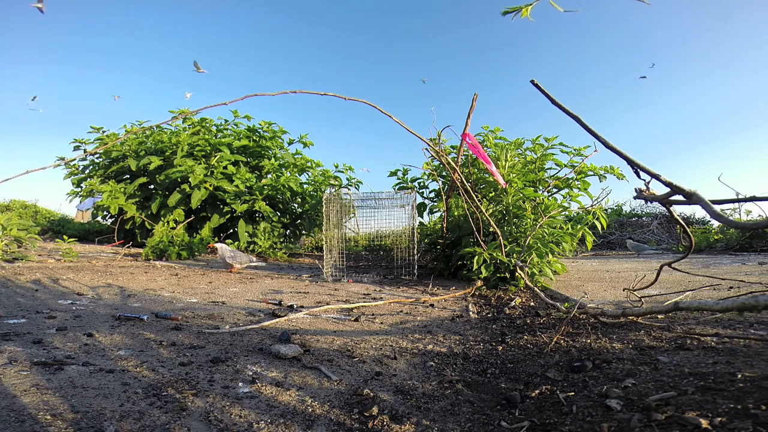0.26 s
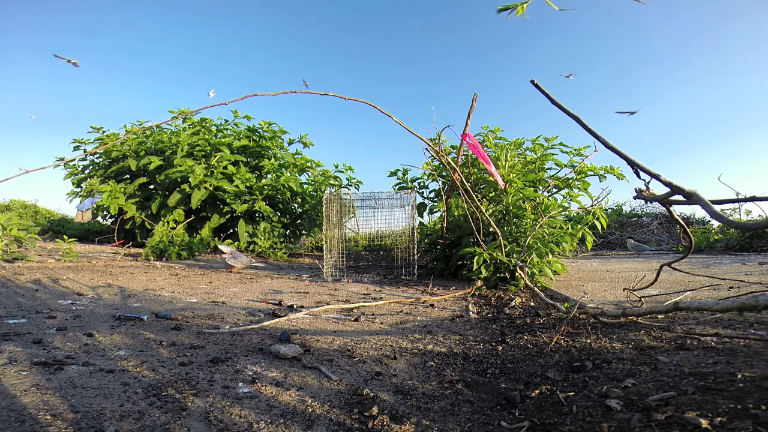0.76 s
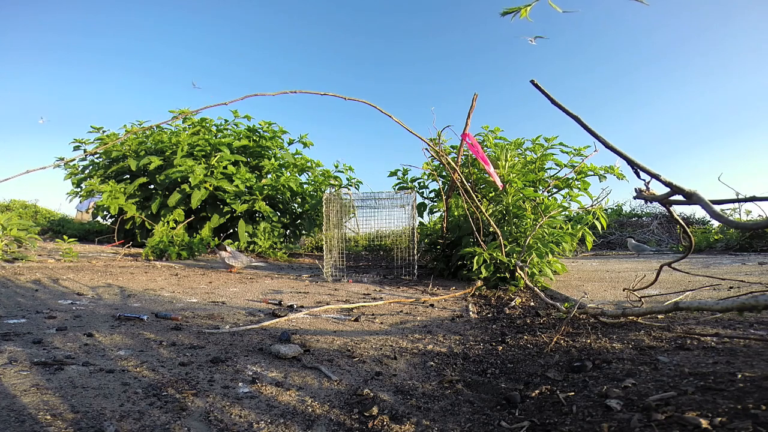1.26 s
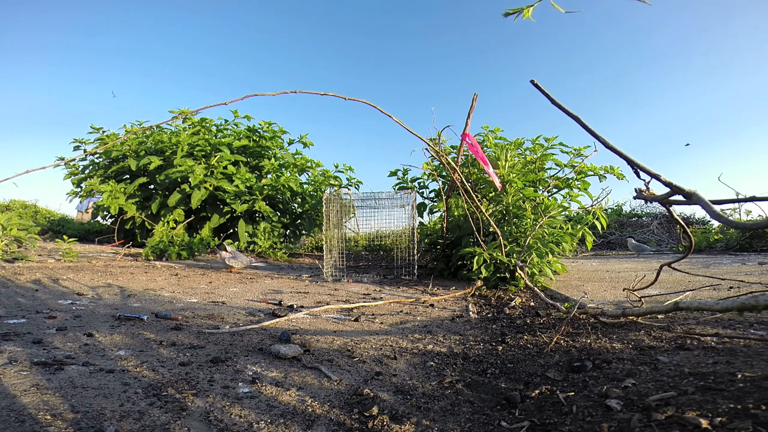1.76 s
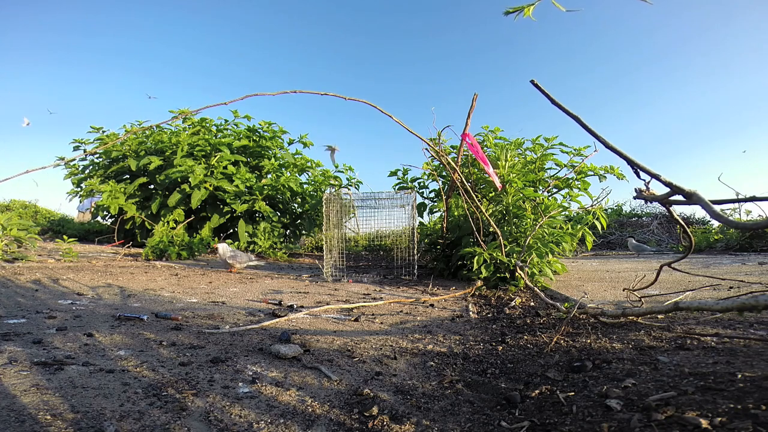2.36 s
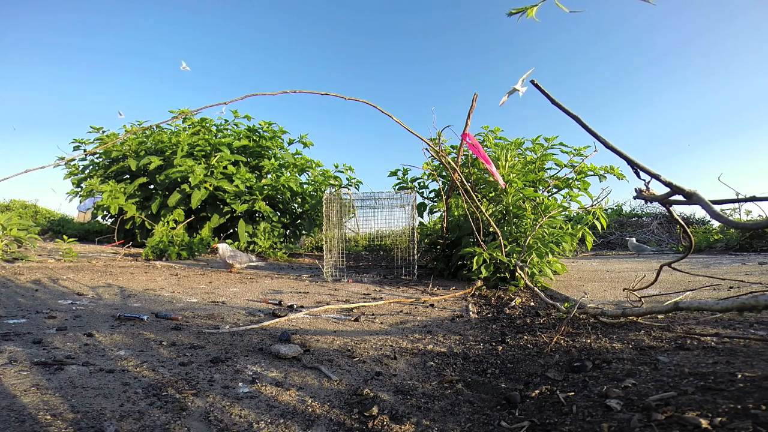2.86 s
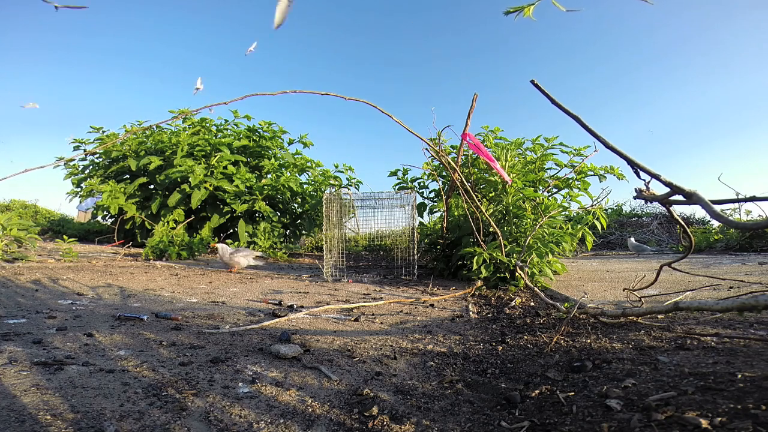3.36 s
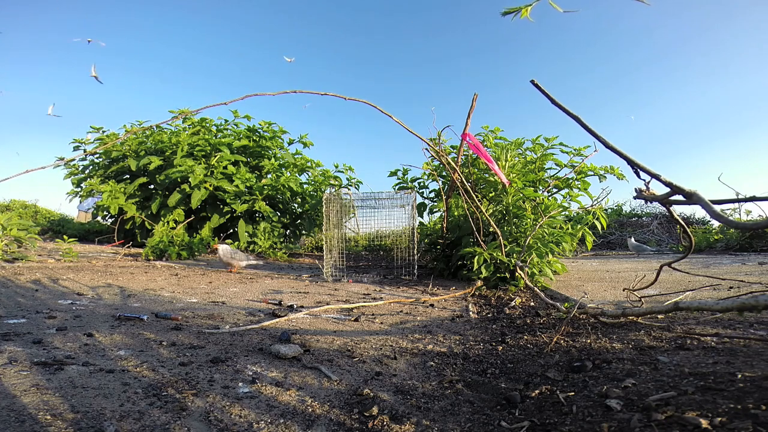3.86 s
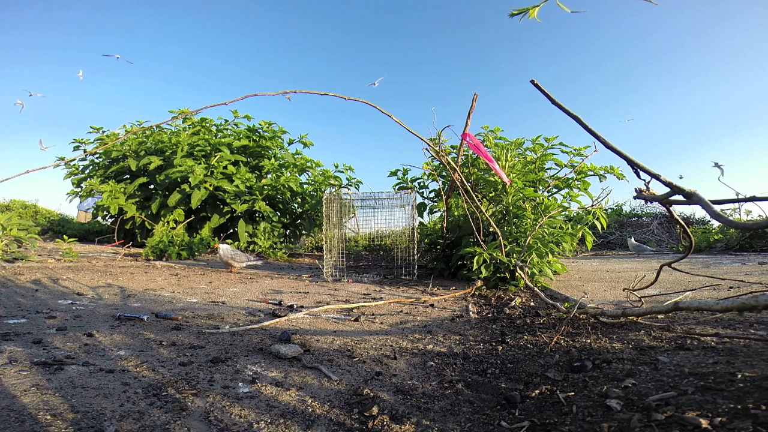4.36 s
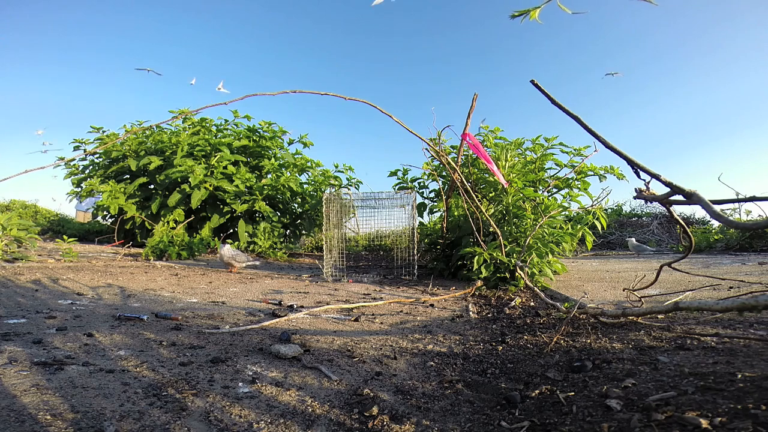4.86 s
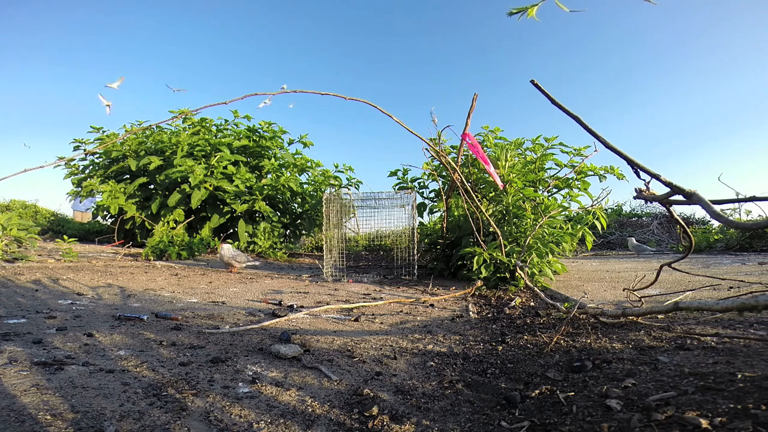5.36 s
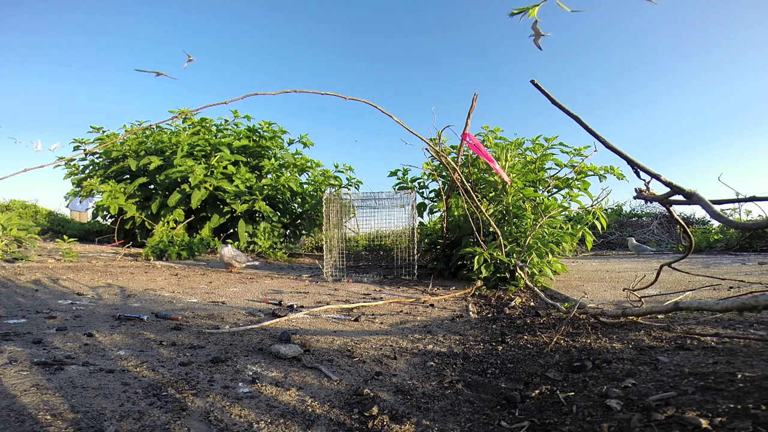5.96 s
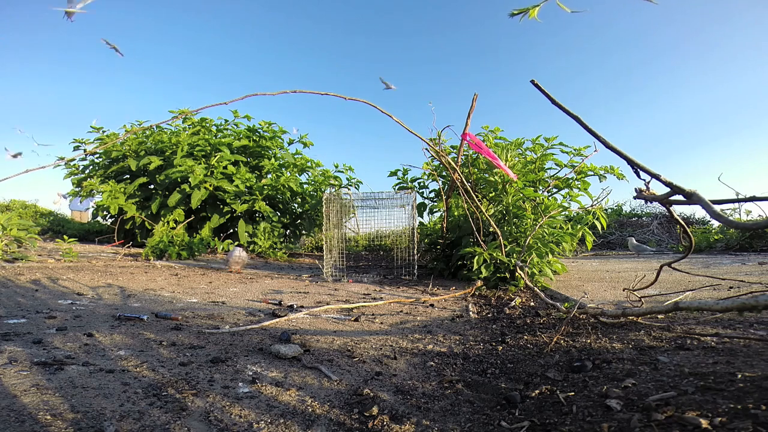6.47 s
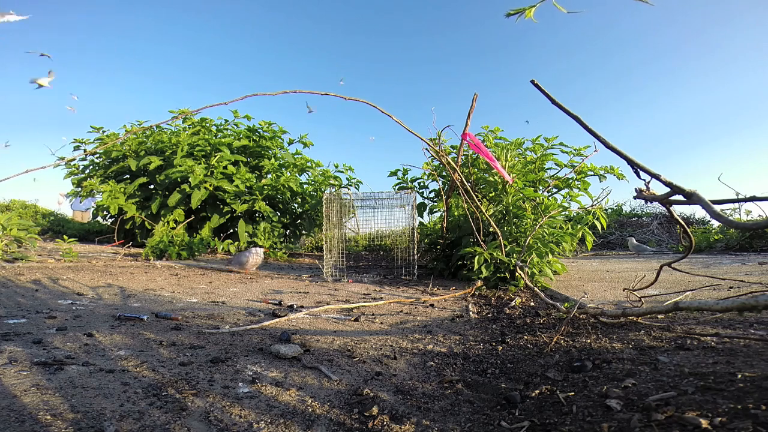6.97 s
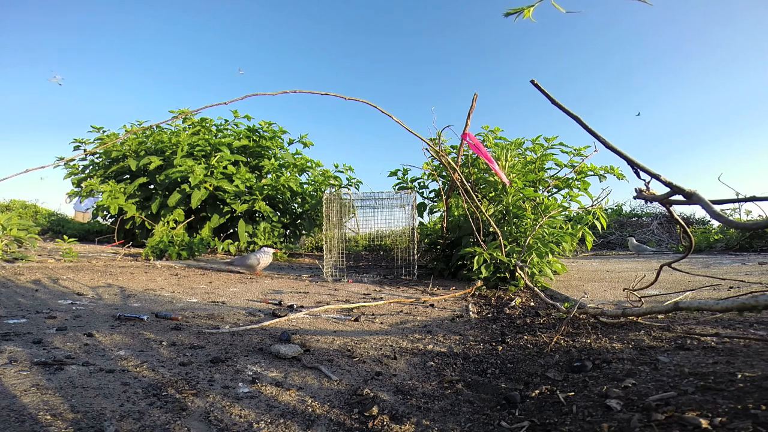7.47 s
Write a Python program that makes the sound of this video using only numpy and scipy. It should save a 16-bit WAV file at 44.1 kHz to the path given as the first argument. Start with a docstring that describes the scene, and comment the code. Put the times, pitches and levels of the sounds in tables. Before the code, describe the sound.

Many seabirds shriek, whistle and scold at once at an open nesting ground, with a few loud raspy cries close by.

```python
"""Tern cries from close by, over open ground among the nests: a clear arch falls, then breaks into a rasp.
Near birds also give low squawks, scolding trills, short kips and dry clicks; others whistle further off.
Harmonics shaped by a throat make the voices; roughness doubles the period, then turns to uneven slaps.
Random distant calls and coloured noise blur into the colony's din, over a low rumble, hum and whine."""
import sys
import numpy as np
from scipy import signal
from scipy.fft import rfft, irfft, next_fast_len
from scipy.io import wavfile

SR = 44100
rng = np.random.default_rng(int(sys.argv[2]) if len(sys.argv) > 2 else 0)


def wrap_up_sound(samples):
    """Save the sound to the file named by the first command line argument, as 16-bit audio."""
    columns = np.atleast_2d(samples).T
    # keep every value between -1 and 1, then stretch to whole-number steps
    tamed = np.clip(columns, -1, 1)
    steps = np.round(tamed * 32767).astype(np.int16)
    wavfile.write(sys.argv[1], SR, steps)


N = 340881
TIME = np.arange(N) / SR

# Call levels below are set before the layer trims in scene() and before the outdoor reflections.
# Two-part cries, a clear arch and its harsh low tail:
# (time [s], length [s], top pitch [Hz], pitch at the break [Hz], bend of the fall [1 straight, 5 late],
#  opened level [dB], time until it opens [s], swell on opening [dB], brightness [dB], ground echo [ms],
#  tail length [s], tail start pitch [Hz], tail end pitch [Hz], tail level [dB], tail growth [dB],
#  tail brightness [dB], tail roughness halfway [0-1])
CRY_NOTES = [(.337, 0.09, 2082, 1716, 1.86, -26.5, 0.025, 9.5, -9.5, 1.41, .148, 1348, 1147, -30.5, -4, -11, 0.71),
             (3.308, 0.12, 1868, 1406, 2.0, -25, 0.046, 11.5, -6.5, 1.48, 0.039, 1175, 1054, -32, 3, -8, 1),
             (4.85, 0.081, 1815, 1660, 6.3, -40.5, 0.0092, -2, 9.5, 1.1, 0.13, 1482, 1070, -32, 4.5, -5, .45),
             (5.071, 0.13, 1950, 1513, 1.7, -28.5, 0.05, 4.5, 1.5, 1.125, 0.049, 1280, 1230, -36, -3, -7, 0.76),
             (5.512, 0.089, 1815, 1596, 3.2, -33.5, .012, 2.5, 9.5, 1.11, 0.18, 1384, 1127, -33.5, 2, -4, 0.19),
             (5.697, 0.11, 1830, 1410, 3.2, -31, 0.045, 3, -1, 1.305, 0.047, 1240, 1150, -43.5, 7, -13, .4),
             (6.205, .073, 1630, 1414, 4.7, -33.5, 0.013, 5, 5, 1.245, .068, 1320, 1034, -29.5, 2, 2, 0.54),
             (7.138, 0.044, 1680, 1480, 3, -41.5, .008, -2, 14, 1.0, 0.14, 1310, 1045, -34, -3.5, 0, 0.79),
             (7.624, 0.026, 1433, 1280, 1.6, -38.5, .006, 5, 3, 1.05, 0.076, 1282, 1105, -37, -2, 5.5, 0.83)]
# Lone falling squawks in the low register:
# (time [s], length [s], start pitch [Hz], end pitch [Hz], level [dB], growth [dB], brightness [dB],
#  roughness halfway [about 0-1])
SQUAWK_NOTES = [(0, 0.066, 1340, 1230, -41.5, -3, -7, 1.04), (0.987, 0.054, 1454, 1189, -37, 3, 6, 1),
                (1.627, 0.053, 1300, 1165, -48, -4, 0, .05), (1.853, .03, 1440, 1316, -48, 0, -5, 0.1),
                (2.769, .13, 1630, 1282, -39, -2, -12, 1.02), (3.937, 0.15, 1496, 1210, -42.5, 5, 4, 0.8),
                (4.232, .055, 1290, 1160, -45.5, -8, -12, 0.26),
                (6.011, 0.099, 1357, 1104, -32, 15, 0, 0.58), (6.747, 0.087, 1280, 1216, -47, -2, -1, 0)]
# Scolding trills:
# (time [s], length [s], syllable rate [1/s], start pitch [Hz], end pitch [Hz], bend of the fall [exponent],
#  level [dB], growth [dB], brightness [dB], start roughness [0-1], end roughness [0-1])
TRILL_NOTES = [(0.715, 0.24, 30, 1590, 1403, 8, -40.5, 3, 4.5, 0.06, 0.47),
               (1.073, 0.34, 41.3, 1680, 1516, 1.7, -41.5, 6, 4.5, 0.16, 0.31),
               (5.849, .35, 44.8, 1766, 1352, 2.2, -35, -6, 2, .12, .95)]
# Short arched notes; the croak runs on for a quarter of the length:
# (time [s], length before the run-on [s], top pitch [Hz], level [dB], brightness [dB], hollowness [dB],
#  roughness [0-1])
KIP_NOTES = [(0.108, 0.028, 1844, -39.5, 9, -8, 0.12), (0.26, 0.052, 1845, -38, 7, 18.5, 0.52),
             (0.451, 0.043, 1670, -31.5, 6, 4, 0.15), (0.962, 0.055, 1837, -37, 11, 19.5, 0.6),
             (1.41, 0.036, 1895, -34, 11.5, 8, 0), (1.836, 0.042, 2010, -36.5, 6.5, -1, 0.02),
             (2.086, 0.023, 1980, -41, -4, -19, 0.05), (2.592, 0.062, 1864, -40.5, 8, 19, 0.2),
             (2.664, 0.042, 2007, -35, -2, -4, 0), (3.099, 0.041, 1696, -32.5, 7, 8, 0.12),
             (3.531, 0.049, 1927, -38, 9.5, 4.5, 0.13), (3.902, 0.039, 1720, -32.5, 6.5, 7, 0.2),
             (4.415, 0.044, 1863, -40, 10, 21.5, 0.22), (6.06, 0.06, 1780, -42, 7, 17, 0.1),
             (6.577, 0.045, 1810, -40.5, 11, 19.5, 0.26), (6.933, 0.039, 1675, -39, -2, 6, 0.18),
             (7.211, 0.051, 1850, -40.5, 11, 20, 0.2)]
# Clean falling calls further off:
# (time [s], length [s], top pitch [Hz], end pitch [Hz], level [dB], brightness [dB])
WHISTLE_NOTES = [(0.087, 0.086, 1905, 1880, -41.5, -7), (0.532, 0.12, 2030, 1875, -44.5, 5),
                 (0.591, 0.12, 1900, 1760, -35, -0.5), (0.712, 0.083, 1800, 1720, -43, -13),
                 (0.974, 0.14, 1833, 1610, -39, -16), (1.146, 0.094, 1904, 1770, -39.5, -1),
                 (1.506, 0.13, 1993, 1594, -45.5, -3), (1.733, 0.1, 1900, 1880, -39, 4),
                 (1.853, 0.13, 1750, 1409, -48, 5), (2.037, 0.047, 1863, 1723, -47.5, 20),
                 (2.162, 0.13, 1862, 1542, -40.5, 4), (2.717, 0.059, 1798, 1655, -32, -7),
                 (2.82, 0.065, 1954, 1759, -41.5, -16), (3.038, 0.044, 2040, 1900, -47, 9),
                 (3.178, 0.075, 2035, 1975, -39.5, -2), (3.589, 0.11, 1903, 1425, -44.5, 1.5),
                 (3.742, 0.067, 1934, 1892, -45.5, -4), (3.789, 0.074, 1960, 1740, -43.5, 11.5),
                 (3.86, 0.21, 2153, 1840, -43, -11), (3.929, 0.082, 1860, 1740, -42.5, 18),
                 (4.144, 0.094, 1914, 1680, -41, 1), (4.473, 0.078, 2126, 1877, -41.5, -10),
                 (4.499, 0.089, 1684, 1450, -44, -13), (4.634, 0.11, 1890, 1596, -44.5, 5.5),
                 (5.287, 0.03, 1857, 1910, -41, 6), (5.396, 0.096, 2122, 2070, -48.5, -2),
                 (6.147, 0.15, 1815, 1670, -37.5, -5), (6.331, 0.077, 1792, 1480, -36.5, -5),
                 (6.434, 0.089, 1842, 1360, -36.5, -4), (6.876, 0.056, 1924, 1594, -43, -4),
                 (7.05, 0.043, 1760, 1700, -45, -17), (7.377, 0.12, 1888, 1685, -45, 7.5),
                 (7.51, 0.052, 1950, 1658, -54, 21)]
# Dry scolding clicks: (time [s], level [dB], decay scale [s])
KEK_NOTES = [(.222, -29.5, 0.0054), (0.337, -39, 0.0032), (0.868, -37, 0.0028), (2.16, -37, 0.0043),
             (2.346, -39.5, 0.0047), (2.64, -35, .014), (4.451, -36, 0.016), (5.399, -41, 0.006),
             (5.435, -35, 0.004), (6.915, -33.5, 0.0058), (6.966, -32.5, 0.0091), (7.015, -33.5, 0.0028),
             (7.139, -39.5, 0.0054), (7.471, -39, 0.0085), (7.623, -40, .005)]
# Swell of the colony's din, before its trim: (time [s], level [dB])
DIN_LEVEL = [(0, -44), (.6, -41), (1.25, -44), (2.2, -42.5), (2.45, -47), (2.75, -39), (3, -45.5),
             (3.3, -41), (3.55, -47.5), (3.95, -38.5), (4.3, -49), (4.85, -40.5), (5.35, -47), (5.6, -38.5),
             (6.45, -39.5), (6.72, -43), (7.73, -44.5)]
# Resonances of a tern's throat and open bill: (frequency [Hz], relative level [dB])
THROAT_SHAPE = [(600, -41), (1150, -22.5), (1400, -9), (1750, -18), (2100, -17), (2550, 7), (3100, 3.5),
                (3700, 2), (4300, -0.5), (5000, -14), (5700, -7), (6700, -17), (8000, -35.5), (9300, -31),
                (11000, -46), (14000, -49)]
# Colour of the colony from afar: (frequency [Hz], relative level per hertz [dB])
FAR_COLOUR = [(900, -22), (1200, -7.5), (1500, 3.5), (1800, -8.5), (2200, -1), (2550, 2), (3000, 4.5),
              (3600, -14), (4300, 7.5), (4900, -2.5), (5700, -5), (6600, -17), (7700, -24.5), (13000, -44)]
# Colour of the rumble of air and shore: (frequency [Hz], relative level per hertz [dB])
AIR_COLOUR = [(10, -24), (25, -2.5), (60, -1.5), (130, -3), (250, -7), (500, -11), (1000, -15.5),
              (2500, -16.5), (8000, -38), (12000, -30), (15000, -69)]
# Faint steady hum and whine: (frequency [Hz], rms level [dB])
WHINE_TONES = [(55, -72), (8781, -75.5), (11688, -87.5), (11718, -77), (14625, -83)]

EDGE_HZ = 15200
# cry arch: share of it spent rising, scoop below the top as a share of pitch, time the opening takes [s]
RISE_SHARE, SCOOP, OPEN_S = 0.303, 0.122, 0.0037
# squawk: pitch falls fast then slower [exponent], roughness gained start to end, level lost by the end [dB]
SQUAWK_BEND, ROUGHEN, SQUAWK_END_DB = .75, 1.0, -6.5
# trill: the first syllable swells in over this time [s], from this level [dB]
TRILL_ATTACK_S, TRILL_ONSET_DB = 0.016, -3


def amp(db):
    """Decibels to gain."""
    return 10 ** (np.asarray(db) / 20)


def evened(x):
    """Scales to rms 1."""
    return x / np.sqrt(np.mean(x ** 2) + 1e-20)


def read(points, hz):
    """Reads a spectrum in dB on a log-frequency axis."""
    f, db = np.transpose(points)
    return np.interp(np.log(hz + 1), np.log(f), db)


def colour(x, points):
    """Filters by a spectrum."""
    size = next_fast_len(len(x))
    gains = amp(read(points, np.fft.rfftfreq(size, 1 / SR)))
    return irfft(rfft(x, size) * gains, size)[:len(x)]


def wander(t, rate):
    """A random curve that heads for a new value rate times a second."""
    knots = rng.standard_normal(2048)
    return np.interp((t - t[0]) * rate, np.arange(len(knots)), knots)


def progress(length):
    """Runs from 0 to 1 over a note of this length in seconds."""
    return np.arange(0, 1, 1 / (length * SR))


def add(mix, s, sound):
    """Mixes a sound in at time s."""
    part = mix[max(round(s * SR), 0):][:len(sound)]
    part += sound[:len(part)]


def play(call, rows):
    """Mixes one kind of call, row by row."""
    mix = np.zeros(N)
    for row in rows:
        add(mix, *call(*row))
    return mix


def fade(t, edge):
    """Ramps a note in and out over edge seconds."""
    return np.clip(np.minimum(t - t[0], t[-1] - t) / edge, 0, 1)


def rasp(t, bright_db, slap_hz=300, unevenness=.33, size_db=2, hiss=0.22, ring=0.36, treble_db=-3):
    """Chaotic voice: membranes slap unevenly; each slap rings the throat with a little hiss behind it."""
    turns = np.cumsum(slap_hz * np.exp(unevenness * wander(t, 300))) / SR
    slaps = np.diff(np.floor(turns), prepend=0) * amp(size_db * rng.standard_normal(len(t)))
    # the hiss dies away over a share of each turn
    breath = hiss * np.exp(-(turns % 1) / ring) * rng.standard_normal(len(t))
    sound = colour(slaps + breath, THROAT_SHAPE)
    body = colour(sound, [(3800, 0), (5000, -30)])
    treble = sound - body
    return evened(body + amp(treble_db + 0.54 * bright_db) * treble)


def voice(t, hz, bright_db, rough, low_db=0, top_db=-1, jitter=0.0034, rough_jitter=0.0089,
          flutter_db=2.5, half_db=-3):
    """Harmonics through the throat; with roughness the period doubles, then breaks into a rasp."""
    hz = hz * (1 + (jitter + rough_jitter * rough) * wander(t, 497.4))
    phase = 2 * np.pi * np.cumsum(hz) / SR
    # harmonics 1 to 8, with the half-steps that a doubled period adds
    k = np.arange(2, 17)[:, None] / 2
    halves = amp(half_db) * np.clip((rough - .1) / .33, 0, 1)
    # brightness works above 4.2 kHz and eases towards 9 kHz; the top edge works above 7.6 kHz
    upper = np.clip((k * hz - 4200) / 600, 0, 1) * np.interp(k * hz, [6500, 9000], [1, .5])
    top = np.clip((k * hz - 7600) / 1200, 0, 1)
    # each partial fades on its own as the bird turns
    turning_db = 2.8 * np.array([wander(t, 38.2) for _ in k])
    gains = amp(read(THROAT_SHAPE, k * hz) + bright_db * upper + top_db * top + turning_db)
    gains = gains * np.where(k % 1 > 0, halves, 1)
    # level is set by everything above the fundamental
    gains /= np.sqrt((gains[1:] ** 2).sum(0) / 2)
    gains[0] *= amp(low_db)
    tone = (gains * np.sin(k * phase + rng.uniform(0, 2 * np.pi, k.shape))).sum(0)
    tone *= amp(flutter_db * wander(t, 131.7))
    # a rough voice also shudders quickly in level
    tone *= 1 + .4 * np.clip(rough, 0, 1) * wander(t, 700)
    chaos = .7 * np.clip(rough, 0, 1) ** 5
    sound = np.sqrt(1 - chaos) * tone + np.sqrt(chaos) * rasp(t, bright_db)
    return sound * fade(t, edge=0.00041)


def outdoors(x, ground=0.63, ground_delay=0.001135, scatter_db=-15, t60=0.25):
    """The ground answers at once, later or sooner as birds fly; bushes and rocks scatter a thin tail."""
    bounce = np.interp(TIME - ground_delay * (1 + 0.18 * wander(TIME, 4)), TIME, x)
    t = np.arange(SR // 2) / SR
    # the scattered tail starts 8 ms late
    tail = rng.standard_normal(len(t)) * amp(-60 * t / t60) * (t > .008)
    tail = colour(tail / np.linalg.norm(tail), [(4000, 1.5), (9000, -7)])
    return x + ground * bounce + amp(scatter_db) * signal.fftconvolve(x, tail)[:N]


def background(air_db=-54):
    """Steady noise coloured as a rumble, with sine tones for a faint hum and whine."""
    tones = sum(amp(db) * np.sqrt(2) * np.sin(2 * np.pi * hz * TIME) for hz, db in WHINE_TONES)
    return amp(air_db) * evened(colour(rng.standard_normal(N), AIR_COLOUR)) + tones


def crowd(count=210, calls_db=-3, patchy_db=5.0):
    """Distant birds at random: single cries stand out of the noise blur of all the rest."""
    calls = np.zeros(N)
    for n, (at, length, top, fall, size, bright) in enumerate(rng.random((count, 6))):
        t = np.arange(0, .05 + .13 * length, 1 / SR)
        u = t / t[-1]
        # two calls in five are in the low, harsher register
        low = n % 5 < 2
        base_hz = 1310 + 130 * top if low else 1720 + 330 * top
        hz = base_hz * (1 - (.15 + .25 * fall) * (u - .25) ** 2 / (.25 + 0.31 * u))
        rough = np.clip((u - .7 + 1.5 * low) * 2 * fall, 0, 1)
        sound = voice(t, hz, 9 * bright - 6, rough, low_db=6.0, flutter_db=2)
        swell = np.sqrt(np.sin(np.pi * u).clip(0))
        # loosely even spacing in time
        start = (n + 2 * at - 1) / count * TIME[-1]
        add(calls, start, amp(6.7 * size) * swell * sound)
    # a slight dip near 7.5 kHz and a slight lift from 10 kHz; only the shape survives the levelling
    calls = colour(calls, [(5800, -11), (7500, -12), (10000, -9)])
    blur = evened(colour(rng.standard_normal(N), FAR_COLOUR)) * amp(patchy_db * wander(TIME, 45))
    mix = evened(calls) + .65 * blur
    return amp(np.interp(TIME, *np.transpose(DIN_LEVEL)) + calls_db) * mix


def whistle(s, length, top_hz, end_hz, db, bright_db):
    """A nearly clean voice that rises briefly and falls ever faster, its top edge held back."""
    u = progress(length)
    rise = np.interp(u, [0, .12, .3], [.96, .99, 1])
    fall = np.clip((u - .25) / .75, 0, 1) ** 1.6
    hz = top_hz * rise + (end_hz - top_hz) * fall
    swell_db = np.interp(u, [0, .2, .7, 1], [-6, 0, -2.5, -2.5])
    sound = voice(s + u * length, hz, bright_db, 0.14, low_db=-2.0, top_db=-2.5)
    return s, amp(db + swell_db) * sound


def kek(s, db, decay):
    """A snap of fast membrane slaps that dies at once."""
    t = np.arange(0, 5 * decay, 1 / SR)
    snap = rasp(t, bright_db=8.0, slap_hz=1117, hiss=0.28)
    return s, amp(db) * snap * np.exp(-(t / decay / 1.6) ** 2) * fade(t, edge=.001)


def kip(s, length, top_hz, db, bright_db, hollow_db, hoarse, edge_db=-3, edge_share=0.91):
    """One abrupt pitch arch that collapses into a brief croak."""
    u = np.arange(0, 1.25, 1 / (length * SR))
    arch = np.interp(u, [0, .2, .45, .65, .82, 1, 1.25], [.94, .98, 1, .985, .92, .76, .66])
    swell_db = np.interp(u, [0, .25, .65, .9, 1.25], [-3.0, 0.5, 1.5, -4, -6.5])
    croak = np.clip((u - .85 + 0.54 * hoarse) * 4, 0, 1)
    rough = np.clip(hoarse + croak, 0, 1)
    # a hollow kip is weak in the middle: fundamental and thin top edge stand out until it collapses
    held = np.clip((1.05 - u) * 3, 0, 1)
    top_db = edge_db + edge_share * np.maximum(hollow_db, 0) * held
    sound = voice(s + u * length, top_hz * arch, bright_db * (1 - rough ** 2), rough, hollow_db * held, top_db)
    return s, amp(db + swell_db) * sound


def trill(s, length, rate, start_hz, end_hz, bend, db, growth_db, bright_db, start_rough, end_rough,
          gap_db=-9, dulling_db=-9, wobble=0.0119, uneven_db=-1.0, drift=0.041):
    """Quick flat-topped syllables sink and roughen; between them pitch and level sag and the voice catches."""
    u = progress(length)
    t, tired = s + u * length, u ** bend
    rough = start_rough + (end_rough - start_rough) * tired
    beats = (t - s) * rate + drift * wander(t, rate / 2)
    # peaks once between each two syllables
    gap = (.5 + .5 * np.cos(2 * np.pi * (beats - .87))) ** 3
    sag = (.08 + .25 * rough) * gap ** 1.5 * (1 + .3 * wander(t, rate))
    hz = (start_hz + (end_hz - start_hz) * tired) * (1 - sag + wobble * wander(t, rate))
    caught = np.clip(rough + 0.16 * gap, 0, 1)
    sound = voice(t, hz, bright_db + dulling_db * (u - .5), caught, low_db=1, top_db=5.5)
    onset_db = TRILL_ONSET_DB * np.clip(1 - (t - s) / TRILL_ATTACK_S, 0, 1)
    syllable_db = gap_db * gap ** 2 + uneven_db * wander(t, rate)
    return s, amp(db + onset_db + growth_db * (u - .5) + syllable_db) * sound


def squawk(s, length, start_hz, end_hz, db, growth_db, bright_db, rough, dulling_db=-4):
    """The low register: a falling note whose voice roughens towards a rasp, dulls and sinks at the end."""
    u = progress(length)
    hz = start_hz + (end_hz - start_hz) * u ** SQUAWK_BEND
    swell_db = growth_db * (u - .5) + SQUAWK_END_DB * u ** 4
    rough = np.clip(rough + ROUGHEN * (u - .5), 0, 1.2)
    sound = voice(s + u * length, hz, bright_db + dulling_db * (u - .5), rough, top_db=3)
    return s, amp(db + swell_db) * sound


def cry(s, length, top_hz, break_hz, bend, db, opens, swell_db, bright_db, echo_ms, *tail,
        ground=.75, thin=1.2, edge_db=-2, edge_share=.5):
    """A clear arch breaks into a squawk; its pitch sweeps through the notches of the ground echo."""
    u = progress(length)
    rise = np.clip(1 - u / RISE_SHARE, 0, 1)
    fall = np.clip((u - RISE_SHARE) / (1 - RISE_SHARE), 0, 1)
    hz = top_hz * (1 - SCOOP * rise ** 2.53) + (break_hz - top_hz) * fall ** bend
    # until the voice opens, level and brightness are offset together
    weak_db = swell_db * np.clip(.5 + (opens - u * length) / OPEN_S, 0, 1)
    arch = voice(s + u * length, hz, bright_db + thin * weak_db, .05 + 0.19 * rise,
                 low_db=-1.5, top_db=edge_db + edge_share * weak_db, flutter_db=1.5)
    _, harsh_tail = squawk(s + length, *tail)
    sound = np.concatenate([amp(db - weak_db) * arch, harsh_tail])
    ms = np.arange(len(sound)) * 1000 / SR
    echo = np.interp(ms - echo_ms, ms, sound, left=0)
    return s, (sound + ground * echo) / np.hypot(1, ground)


def scene(cries_db=1.0, squawks_db=0, trills_db=1, kips_db=0, whistles_db=-1.0, keks_db=-1):
    """All the birds in the open air; the cries bring their own ground echo."""
    birds = amp(whistles_db) * play(whistle, WHISTLE_NOTES)
    birds += amp(keks_db) * play(kek, KEK_NOTES)
    birds += amp(kips_db) * play(kip, KIP_NOTES)
    birds += amp(trills_db) * play(trill, TRILL_NOTES)
    birds += amp(squawks_db) * play(squawk, SQUAWK_NOTES)
    cries = amp(cries_db) * outdoors(play(cry, CRY_NOTES), ground=0)
    return (background() + crowd() + outdoors(birds) + cries)[None]


def record(dry):
    """A steep low-pass takes off everything above the band edge."""
    low_pass = signal.firwin(511, EDGE_HZ, window=("kaiser", 9), fs=SR)
    return signal.oaconvolve(dry, low_pass[None], "same")


dry = scene()
out = record(dry)
wrap_up_sound(out)
```